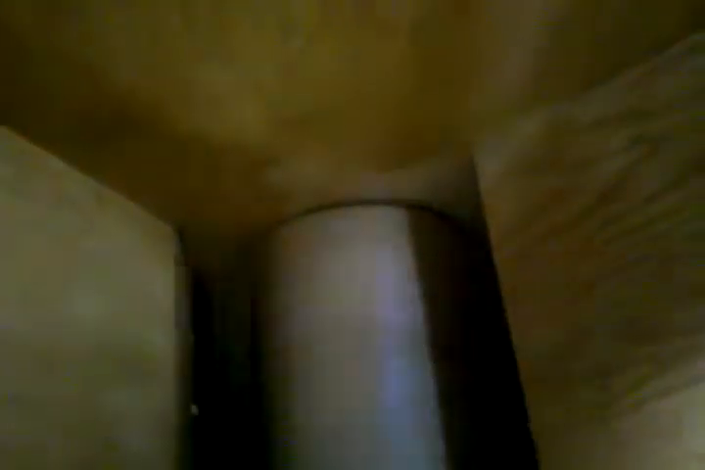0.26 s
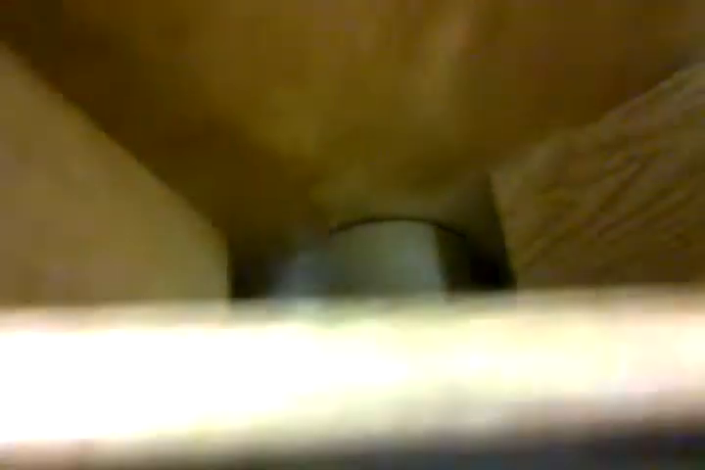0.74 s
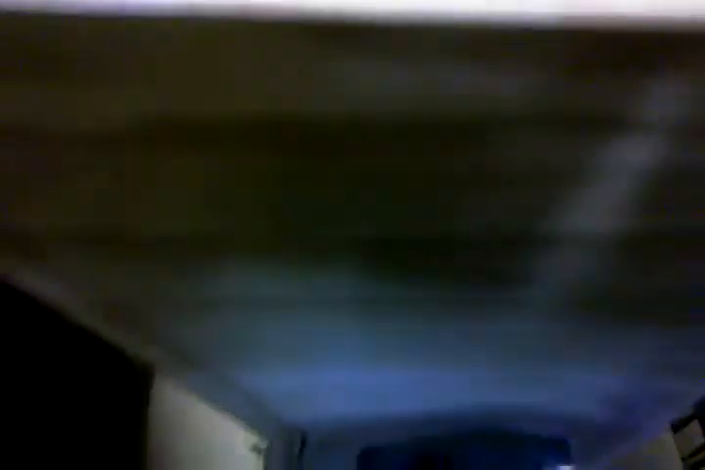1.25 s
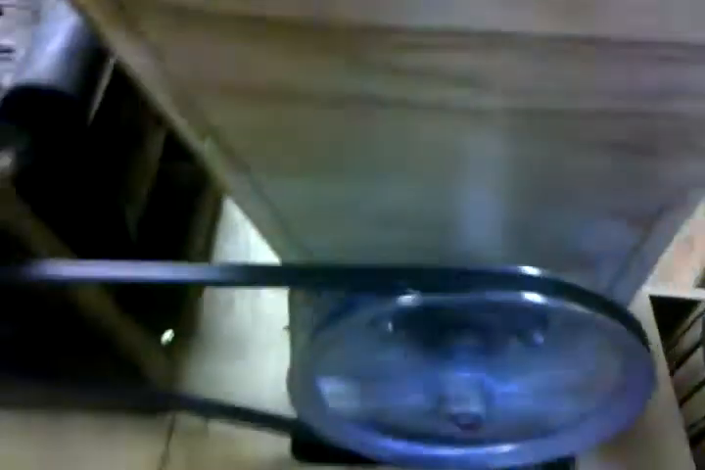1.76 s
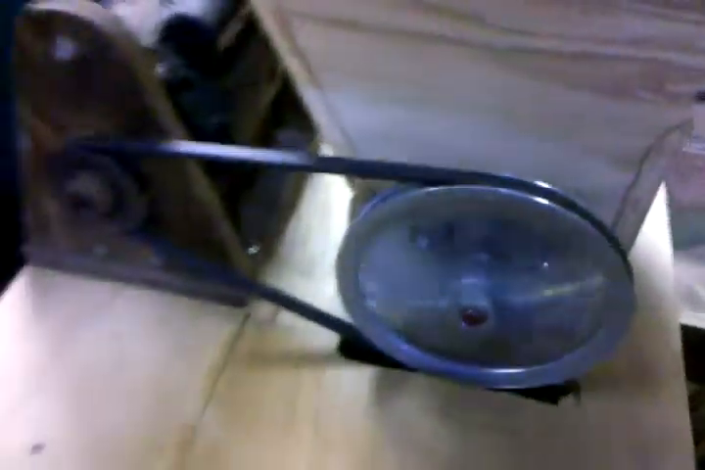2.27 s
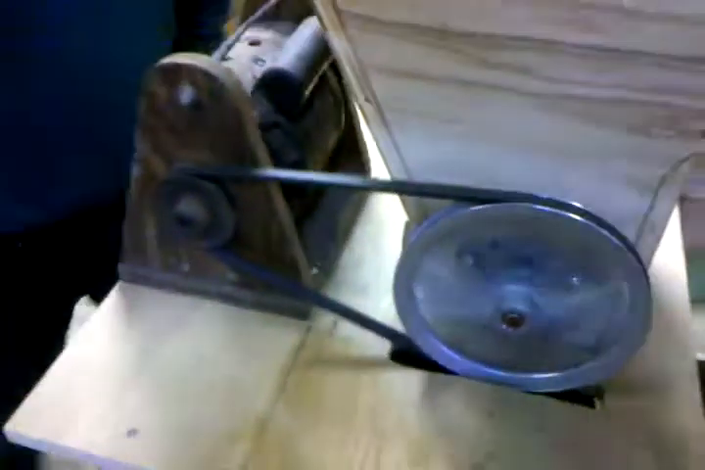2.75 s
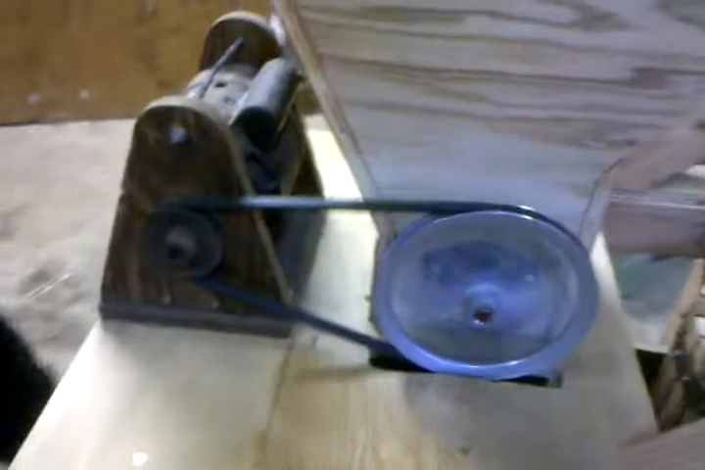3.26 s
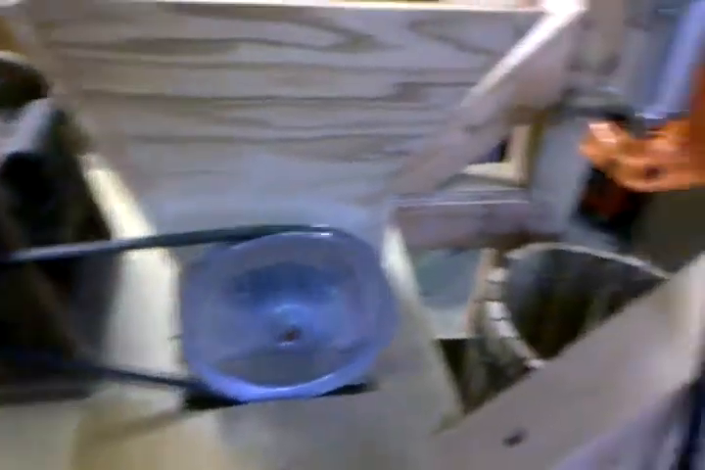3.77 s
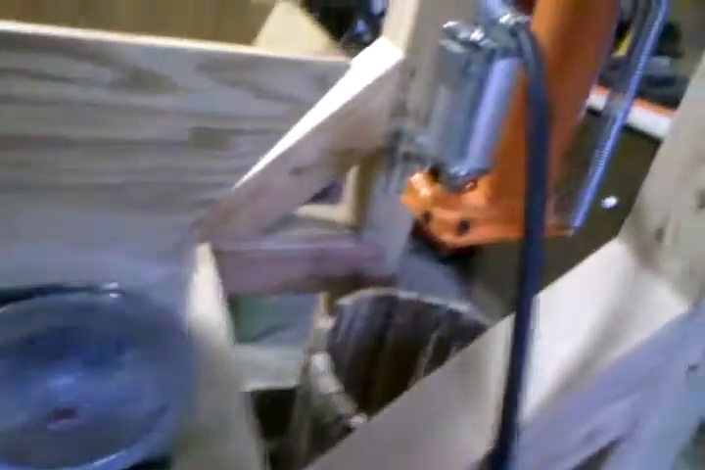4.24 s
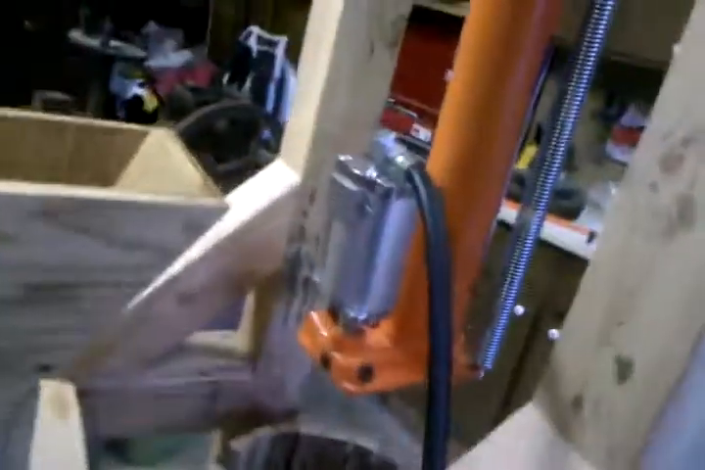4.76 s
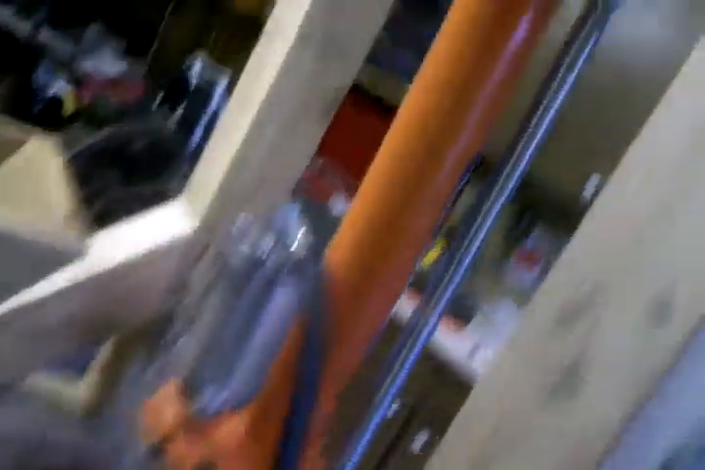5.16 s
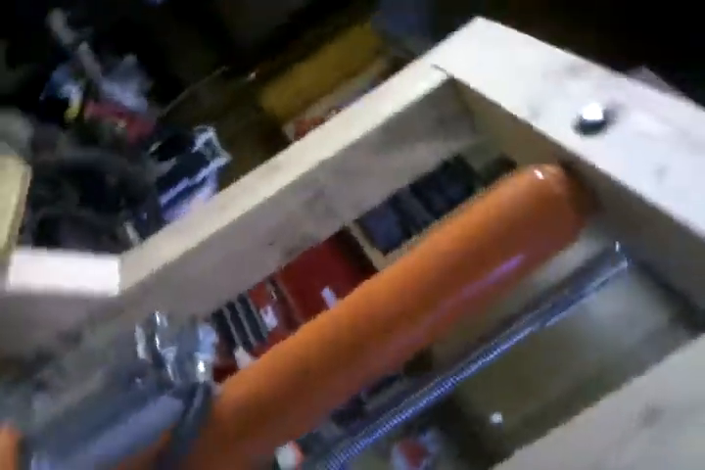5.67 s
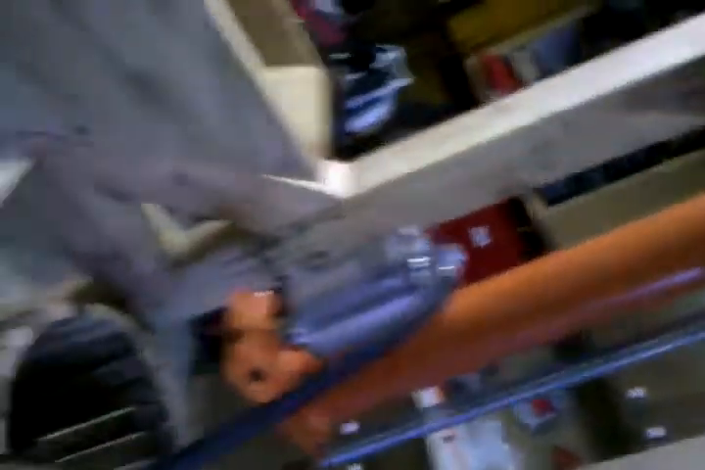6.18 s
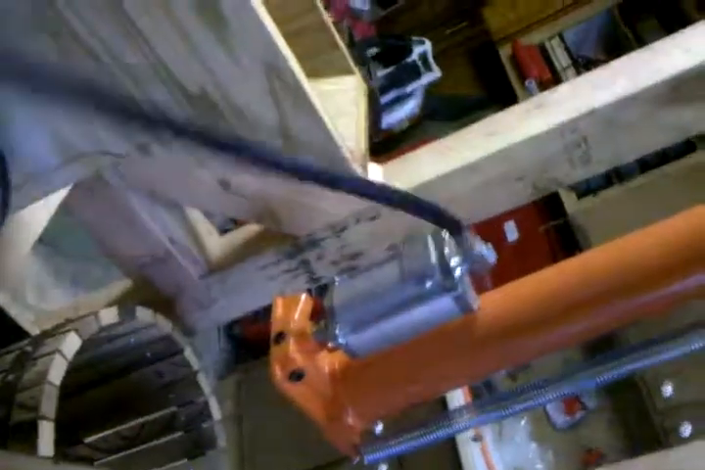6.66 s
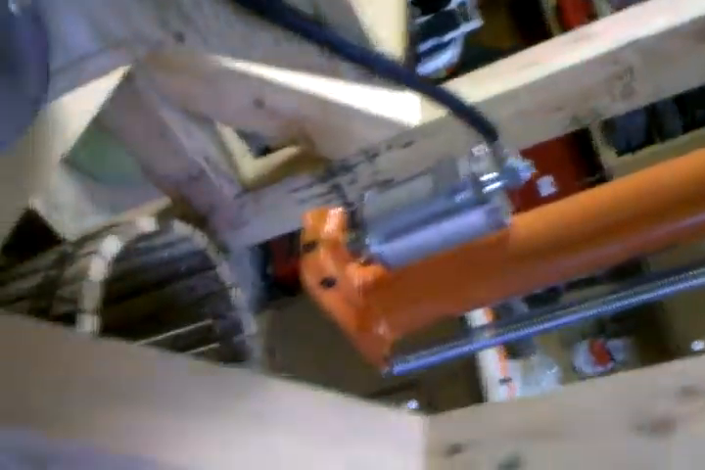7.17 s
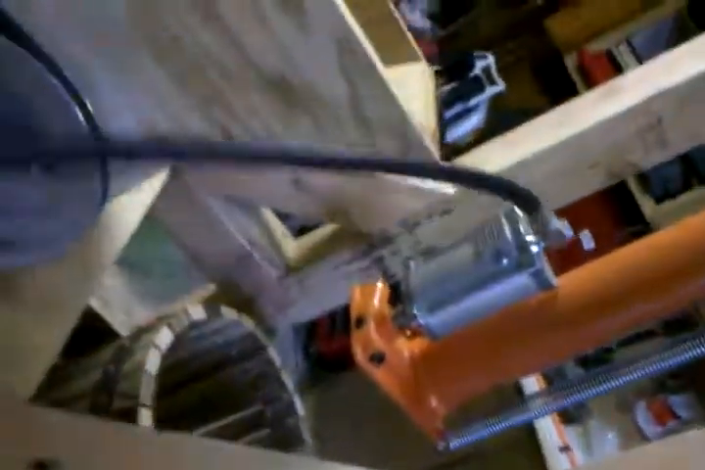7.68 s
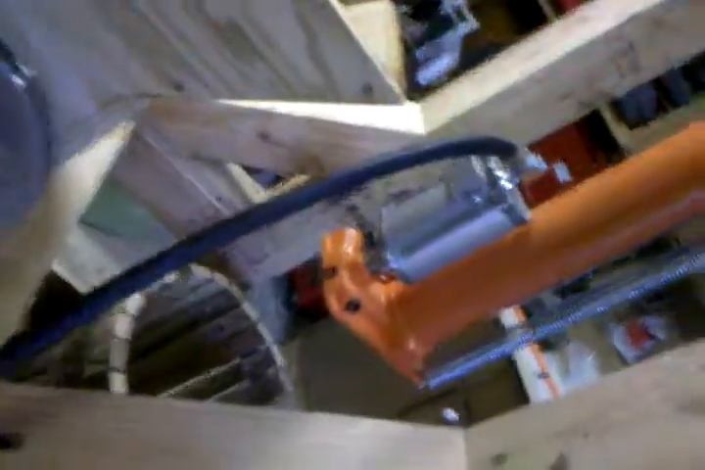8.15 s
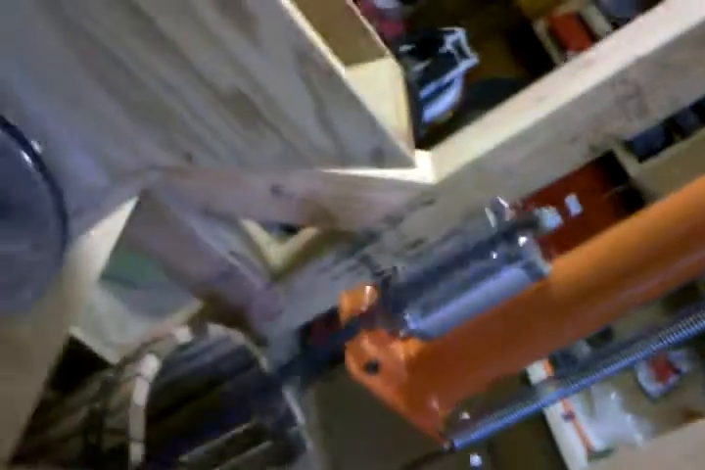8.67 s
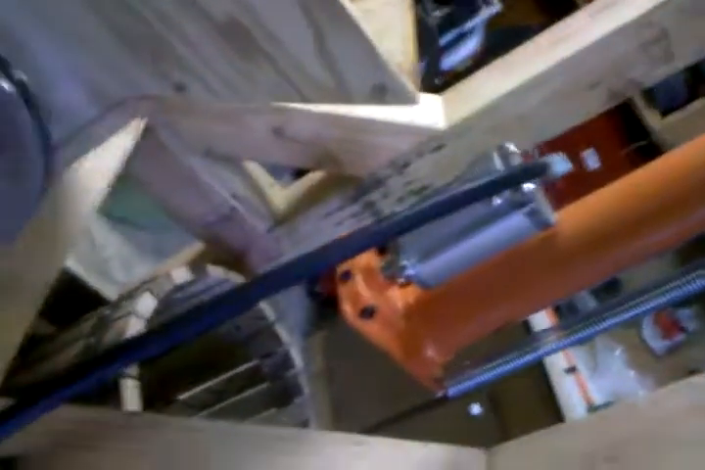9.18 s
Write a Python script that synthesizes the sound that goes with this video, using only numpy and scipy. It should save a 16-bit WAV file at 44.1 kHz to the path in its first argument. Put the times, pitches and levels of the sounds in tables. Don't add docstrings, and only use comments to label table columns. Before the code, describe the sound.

A belt-driven fruit grinder runs without change of speed for about 9.4 seconds in a workshop, a dense buzzing drone with a fast flutter of around 29 turns a second, mains hum and grainy bearing and air noise. From 0 to 2 seconds it is hollow and resonant inside a wooden hopper; the boxiness fades by about 3 as the microphone draws away, its tones swelling and dipping. A very faint short ping falls near 3.0, a hard dry tick at 4.3, a lighter one at 5.6. From 6.5 to 8 the lowest hum thins. Sound drops to silence at 7.23 for about an eighth of a second, then returns abruptly. At 8.95 a dull thud starts an air jack: loud metal clacks near 9.0 and 9.27, each followed by a rising hiss, with thuds at 9.2 and 9.4, where it stops abruptly. The small microphone sounds thin, band-limited and overloads on peaks.

```python
import sys
import numpy as np
from scipy import signal
from scipy.fft import rfft, irfft
from scipy.io import wavfile
from scipy.ndimage import map_coordinates

SR = 44100
rng = np.random.default_rng(int(sys.argv[2]) if len(sys.argv) > 2 else 0)


def gain_from_decibels(decibels):
    exponent = np.asarray(decibels, float) / 20
    return 10 ** exponent


def transcribe(u):
    v = np.clip(np.atleast_2d(u).T, -1, 1)
    q = np.round(v * 32767).astype(np.int16)
    wavfile.write(sys.argv[1], SR, q)


N = 415422

SHAFT_HZ = 29.194
SOUND_M_PER_S = 343
LOW_ORDERS = [(1, -102.5), (2, -63.5), (3, -83), (4, -48), (5, -47.5), (6, -42), (7, -48), (8, -42.5),
              (10, -43.5), (12, -41), (13, -34.5), (15, -45), (20, -45.5), (22, -40.5), (23, -41.5),
              (25, -43), (26, -51.5), (27, -53), (28, -55), (29, -49), (30, -60), (36, -58.5)]
# freq_hz, level_db_rms of one multiple
HIGH_ORDERS = [(1080, -53), (1300, -46.5), (1500, -55.5), (1720, -55.5), (1950, -46), (2200, -57.5),
               (2650, -54.5), (3100, -59), (3350, -62), (4200, -61.5), (4650, -68), (6100, -65),
               (6800, -81), (7600, -89.5)]
CONTACTS = [(.08, 0.75), (.27, 0.81), (.5, 1.08), (.6, 0.74), (.87, 0.64)]
LOUD_ORDERS = 9, 11, 14, 16, 17, 18, 19, 21, 24, 31, 32, 33, 34, 35
# level_db_rms, echo_share, echo_phase_rad, lean_db per unit turn
ECHOES = [(-49, 0.43, 6.2, -7), (-30.5, 0.75, 1.39, 6.5), (-36.5, 0.53, 3.7, 7.5), (-27.5, 0.53, 2.77, 0.6),
          (-38.5, 0.6, 0.56, -3.5), (-44.5, 1, 0.44, -4), (-35.5, 0.4, 5.03, 2.5), (-42, 0.06, 0.29, 5.5),
          (-42.5, 0.2, 2.36, 6), (-42, 0.4, 3.94, 0.7), (-46.5, 0.45, 5.31, -5), (-47.5, 0, 2.39, -1.2),
          (-44.5, 0.2, 1.4, 3), (-49, 0.5, 4.1, 2.5)]
# time_s, change_m
WALK = [(0.0, 0.051), (0.67, 0.039), (1.35, 0.12), (2.02, -0.074), (2.69, -0.27), (3.36, -0.31),
        (4.04, -0.51), (4.71, -0.68), (5.38, -0.65), (6.06, -0.84), (6.7, -0.86), (7.4, -0.89),
        (8.1, -0.89), (8.75, -0.87), (9.42, -0.82)]
# time_s, turn
TURN = [(0, -1.01), (1.5, -0.68), (3.8, -.7), (5, 0.6), (6, 0.72), (7.5, 1.05), (9.4, 0.89)]
HUM_HZ = [71.7, 74.4, 90.3, 119.8, 132.7, 162, 220.2, 240.1, 265.5, 340.2, 360, 389.3, 399.5, 419.4, 480,
          499.8, 518, 620]
HUM_DB = [-57, -72.5, -61.5, -51, -47.5, -51, -66, -52, -66.5, -42.5, -35, -47, -39.5, -48, -42, -38.5,
          -53.5, -57.5]
# freq_hz, density_db_per_hz
RUSH = [(60, -53), (115, -12.5), (210, -15), (320, 2), (560, -9), (760, -10.5), (1000, -16), (1550, -18.5),
        (2250, -21.5), (3100, -22.5), (3350, -25), (4350, -26.5), (4650, -28), (6800, -24.5)]
# freq_hz, width_hz, level_db
PANELS = [(320, 25, 4), (420, 160, -1.5), (1255, 76, 10), (2025, 180, 7.5), (2600, 580, 4.5),
          (4260, 140, 3.5), (6020, 170, 2)]
SPLIT_HZ = 220, 2500, 4900
# halfway_db, swing_db per unit turn
SHADOW = [(0.5, -0.4), (0.25, 0.24), (0.83, 3.5), (-0.23, -1.2)]
# freq_hz, width_hz, level_db
HOPPER = [(270, 76, 0.5), (665, 130, -6.5)]
# time_s, level_db_rms, resonance_hz
MOUTH = [(0, -41.5, 560), (1.1, -37.5, 555), (1.8, -38.5, 520), (2.6, -44, 475), (3.2, -60, 470)]
# time_s, level_db
STOOP = [
    (6.5, 0.8),
    (8, -6.5),
    (9.4, -3),
]
PING = 2.966, 2000, -27, .06
# start_s, peak_db, knock_share
TICKS = [
    (4.33415, -1.2, 1.25),
    (5.6224, -11, .7),
]
DROPOUT_S = 7.2333, 7.3608
# start_s, clack_db, thud_db, rise_s
PISTON = [(8.945, -48, -16, 0.0042)]
# start_s, clack_db, thud_db, rise_s
VALVE = [(9.0063, -6.5, -8.5, 0.00075), (9.264, -15, -16.5, .0016)]
# start_s, clack_db, thud_db, rise_s
HAMMER = [(9.0262, -6, -10, 0.0045), (9.277, -5.5, -21, 0.0064)]
# start_s, clack_db, thud_db, rise_s
REBOUND = [(9.037, -16, -28, 0.0022), (9.295, -14, -14, .003)]
# start_s, clack_db, thud_db, rise_s
STOP = [(9.211, -35, -9.5, .0011), (9.4026, -31, -6, .0011)]
# brightness_db, thud_hz, thud_lag_s
BLOW_KINDS = [
    (-4, 350, .001),
    (-9.5, 195, .008),
    (1.2, 187, 0.0013),
    (-1, 280, 0.00116),
    (-9, 600, 0.0011),
]
# freq_hz, width_hz, level_db
CLACK = [(1100, 400, -2), (1600, 400, -3), (2100, 300, 1), (3150, 350, 2), (3850, 300, 0)]
# freq_hz, width_hz, level_db
CLACK_TOP = [(5800, 1700, 3.5), (6600, 170, -0.5), (6780, 830, -2)]
# open_s, peak_s, shut_s, peak_db_rms
EXHAUST = [
    (9.042, 9.152, 9.22, -24.5),
    (9.305, 9.376, 9.407, -24),
]
# freq_hz, width_hz, level_db
NOZZLE = [(6050, 250, -3), (6400, 220, 0), (6750, 300, -4)]
# freq_hz, width_hz, level_db
WHISTLE = [(5650, 160, 1), (1900, 500, -3), (3800, 900, -8), (1200, 300, -6)]


def in_time(table):
    s, *columns = np.transpose(table)
    return [np.interp(np.arange(N) / SR, s, c) for c in columns]


def at_hz(points, hz):
    point_hz, point_db = np.transpose(points)
    return np.interp(np.log(hz), np.log(point_hz), point_db)


def rms_one(x):
    return x / np.sqrt(np.mean(x ** 2) + 1e-20)


def drift(rate_hz):
    points = rng.standard_normal(200)
    place = np.arange(N // 64 + 1) * 64 / SR * rate_hz % 199
    return map_coordinates(points, [place], order=3).repeat(64)[:N]


def lowpass(order, hz):
    return signal.butter(order, hz, fs=SR, output="sos")


def resonances(x, modes):
    out = 0
    for k, (hz, width_hz, level_db) in enumerate(modes):
        r = np.exp(-np.pi * width_hz / SR)
        ring = signal.lfilter([1, 0, -1], [1, -2 * r * np.cos(2 * np.pi * hz / SR), r * r], x)
        out = out + (-1) ** k * gain_from_decibels(level_db) * (1 - r * r) / 2 * ring
    return out


def motor(diffuse=.65, places_per_s=1.1, smear_rad=.75):
    order = np.arange(1, 261)
    level_db = at_hz(HIGH_ORDERS, order * SHAFT_HZ)
    for k, low_db in LOW_ORDERS:
        level_db[round(k) - 1] = low_db
    level_db[np.array(LOUD_ORDERS) - 1] = -120
    direct = sum(size * np.exp(-2j * np.pi * order * at) for at, size in CONTACTS)
    paths = rng.standard_normal((15, 260)) + 1j * rng.standard_normal((15, 260))
    frame = np.exp(1j * smear_rad * rng.standard_normal(260))
    waves = direct / abs(direct) * frame + diffuse * paths
    waves *= gain_from_decibels(level_db + 1.0) / np.sqrt(np.mean(abs(waves[:11]) ** 2, axis=0))
    turns = irfft(np.pad(waves, ((0, 0), (1, 0))), 8192) * 8192 / np.sqrt(2)
    s = np.arange(N) / SR
    return map_coordinates(turns, [s * places_per_s, s * SHAFT_HZ % 1 * 8191], order=1)


def rush(level_db=-26, beat=0.68, gap_s=0.0072):
    hz = np.maximum(np.fft.rfftfreq(N, 1 / SR), 1)
    panels_db = sum(db / (1 + (2 * (hz - mid_hz) / width_hz) ** 2) for mid_hz, width_hz, db in PANELS)
    turns = np.arange(N) / SR * SHAFT_HZ
    kicks = sum(size * np.exp(-((turns - at) % 1) / SHAFT_HZ / gap_s) for at, size in CONTACTS)
    noise = rng.standard_normal(N) * (1 + beat * kicks) * gain_from_decibels(0.97 * drift(15))
    spectrum = rfft(noise) * gain_from_decibels(at_hz(RUSH, hz) + panels_db)
    return gain_from_decibels(level_db) * rms_one(irfft(spectrum, N))


def facing(x):
    lows = [0 * x] + [signal.sosfiltfilt(lowpass(4, hz), x) for hz in SPLIT_HZ] + [x]
    turn, = in_time(TURN)
    return sum((upper - lower) * gain_from_decibels(level_db + swing_db * turn)
               for lower, upper, (level_db, swing_db) in zip(lows, lows[1:], SHADOW))


def loud_orders():
    mouth_lift_db, mouth_reach_hz, mouth_gone_s = 4.5, 25, 1.97
    s = np.arange(N) / SR
    (path_m,), (turn,) = in_time(WALK), in_time(TURN)
    mouth_hz, near = in_time(MOUTH)[1], np.clip(mouth_gone_s + .5 - s, 0, 1)
    out = 0
    for k, (level_db, echo, lag_rad, lean_db) in zip(LOUD_ORDERS, ECHOES):
        hz = k * SHAFT_HZ
        echo_phase = 2 * np.pi * hz * path_m / SOUND_M_PER_S + lag_rad
        swell = np.sqrt(1 + echo ** 2 + 2 * echo * np.cos(echo_phase))
        lift_db = mouth_lift_db * near / (1 + ((hz - mouth_hz) / mouth_reach_hz) ** 2)
        gain = gain_from_decibels(level_db + lift_db + lean_db * turn + 0.55 * drift(6.5))
        out = out + swell * gain * np.sin(2 * np.pi * hz * s + k * k)
    return np.sqrt(2) * out


def hums(wander_db=1.5):
    s = np.arange(N) / SR
    return np.sqrt(2) * sum(
        gain_from_decibels(level_db + wander_db * drift(1.5)) * np.sin(2 * np.pi * hz * s + 1.07 * drift(1.201))
        for hz, level_db in zip(HUM_HZ, HUM_DB))


def hopper(mouth_width_hz=60, cavity_db=5):
    level_db, hz = in_time(MOUTH)
    slow = signal.sosfilt(lowpass(2, mouth_width_hz / 2), rng.standard_normal((2, N)))
    phase = 2 * np.pi * np.cumsum(hz) / SR
    mouth = rms_one(slow[0] * np.cos(phase) + slow[1] * np.sin(phase))
    cavity = rms_one(resonances(rng.standard_normal(N), HOPPER))
    return gain_from_decibels(level_db) * (mouth + gain_from_decibels(cavity_db) * cavity)


def loose_fitting():
    out, s = np.zeros(N), np.arange(4000) / SR
    at, hz, peak_db, t60_s = PING
    ring = np.sin(2 * np.pi * hz * s) * (1 - np.exp(-s / .004))
    out[round(at * SR):][:4000] += gain_from_decibels(peak_db - 60 * s / t60_s) * ring
    return out


def ticks():
    out, s = np.zeros(N), np.arange(200) / SR
    knock = -np.sin(2 * np.pi * 1250 * s) * np.exp(-s / .0005)
    ping = np.sin(2 * np.pi * 5800 * s) * np.exp(-s / .0003)
    for at, peak_db, share in TICKS:
        start = round(at * SR)
        out[start:][:200] += gain_from_decibels(peak_db) * share * knock
        out[start + 11:][:200] += gain_from_decibels(peak_db) * ping
    return out


def jack_blows():
    out, s = np.zeros(N + 8000), np.arange(8000) / SR
    tables = PISTON, VALVE, HAMMER, REBOUND, STOP
    blows = [(*row, *kind) for rows, kind in zip(tables, BLOW_KINDS) for row in rows]
    white = rng.standard_normal((len(blows), 8000))
    body, top = rms_one(resonances(white, CLACK)), rms_one(resonances(white, CLACK_TOP))
    for blow, low, high in zip(blows, body, top):
        at, clack_db, thud_db, rise_s, top_db, thud_hz, lag_s = blow
        t60_s = 0.024 + 4.0 * rise_s
        clatter = low + gain_from_decibels(top_db) * high
        clack = gain_from_decibels(clack_db - 60 * s / t60_s) * (1 - np.exp(-s / rise_s)) * clatter
        thud = gain_from_decibels(thud_db - 60 * s * thud_hz / 12) * np.sin(2 * np.pi * thud_hz * s)
        thud *= 1 - np.exp(-s * thud_hz * 7.4)
        out[round(at * SR):][:8000] += clack
        out[round((at + lag_s) * SR):][:8000] += thud
    return out[:N]


def puff(open_s, peak_s, shut_s, peak_db):
    start_db, knee_db, end_db, surge_s = -12, -7.5, -15, 0.028
    opening_s, closing_s, shut_db = .01, .012, -80
    lift_db, lift_s = 0.5, 0.017
    whistle_db = peak_db - 9
    return [(open_s - opening_s, shut_db, shut_db),
            (open_s, peak_db + start_db, whistle_db),
            (peak_s - surge_s, peak_db + knee_db, whistle_db),
            (peak_s, peak_db, whistle_db),
            (shut_s - lift_s, peak_db + 0.9 * end_db, whistle_db + lift_db),
            (shut_s, peak_db + end_db, whistle_db),
            (shut_s + closing_s, shut_db, shut_db)]


def exhaust():
    jet = rms_one(resonances(rng.standard_normal(N), NOZZLE))
    whistle = rms_one(resonances(rng.standard_normal(N), WHISTLE))
    jet_db, whistle_db = in_time(np.concatenate([puff(*row) for row in EXHAUST]))
    return gain_from_decibels(jet_db) * jet + gain_from_decibels(whistle_db + 4.5) * whistle


def scene(stoop_hz=130):
    grinder = facing(motor() + rush()) + loud_orders() + hums()
    bass = signal.sosfiltfilt(lowpass(2, stoop_hz), grinder)
    grinder = grinder + (gain_from_decibels(in_time(STOOP)[0]) - 1) * bass
    mix = grinder + hopper() + loose_fitting() + ticks() + jack_blows() + exhaust()
    return mix[None]


def band_limit(x):
    return signal.sosfilt(signal.butter(12, 16300, fs=SR, output="sos"), x)


def record(dry):
    bass_cut_hz, top_cut_hz, clip = 97, 6814, .7
    native_hz, image_cut_hz, image_db = 16000, 8680, -16.5
    s = np.arange(N) / SR
    x = signal.sosfilt(signal.butter(4, bass_cut_hz, "high", fs=SR, output="sos"), dry)
    x = signal.sosfilt(signal.cheby1(8, 1, top_cut_hz, fs=SR, output="sos"), x)
    drop_start_s, drop_end_s = DROPOUT_S
    x = x * ((s < drop_start_s) + np.clip((s - drop_end_s) / .0015, 0, 1))
    x = x * np.clip((s[-1] - s) / 0.0082, .2, 1)
    mirror = gain_from_decibels(image_db) * x * np.cos(2 * np.pi * native_hz * s)
    x = signal.sosfiltfilt(signal.cheby1(10, .1, image_cut_hz, fs=SR, output="sos"), x + mirror)
    x = np.clip(x, -clip, clip)
    return band_limit(x)


dry = scene()
out = record(dry)
transcribe(out)
```